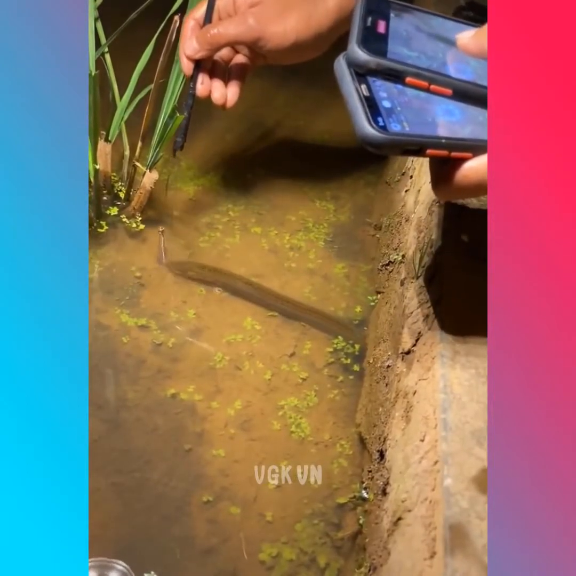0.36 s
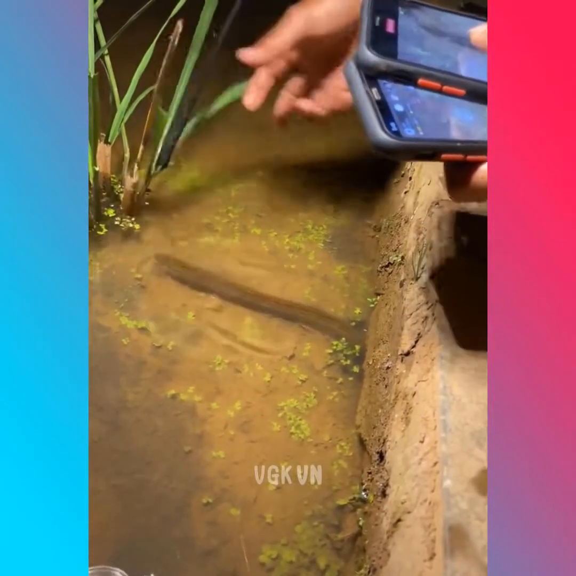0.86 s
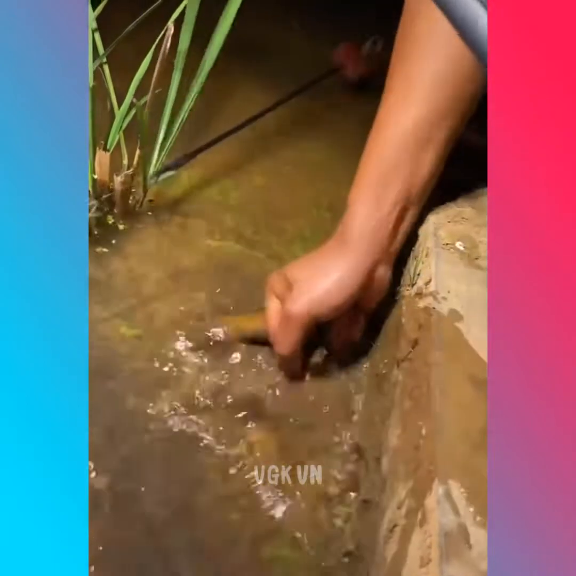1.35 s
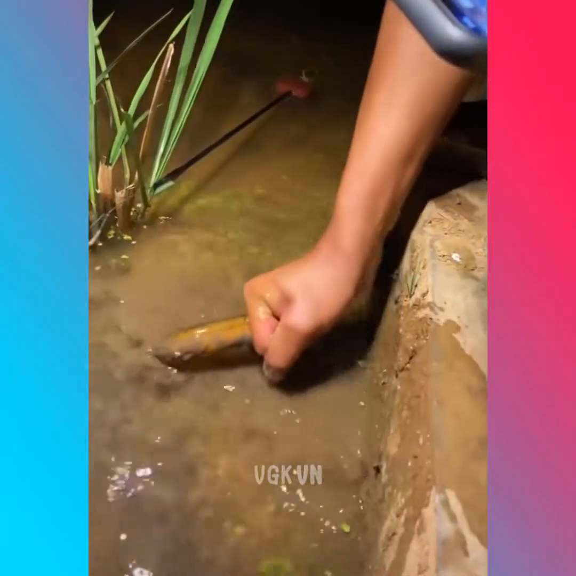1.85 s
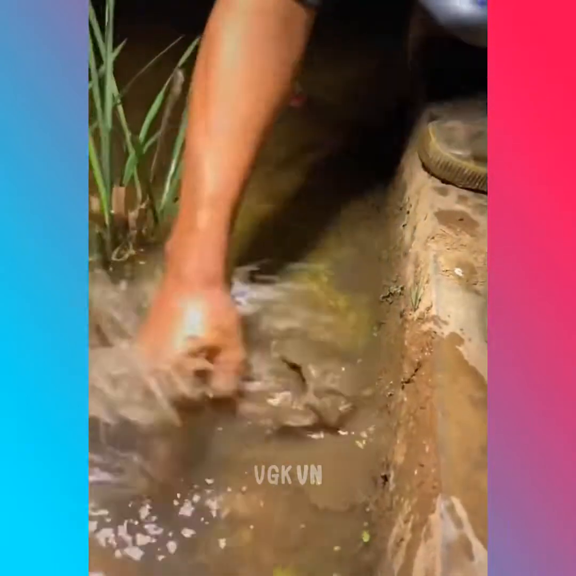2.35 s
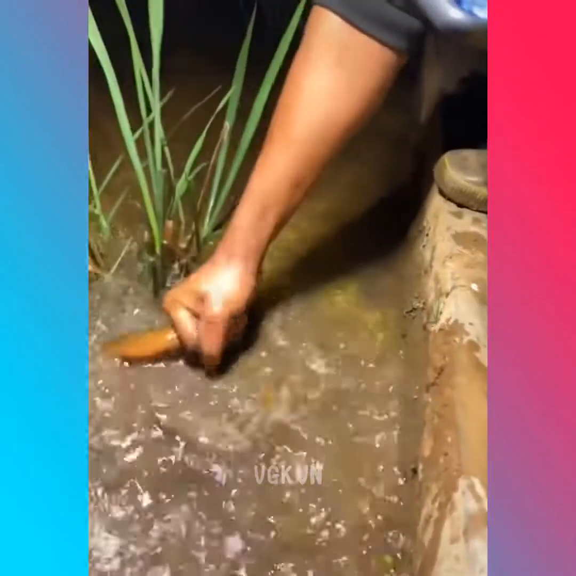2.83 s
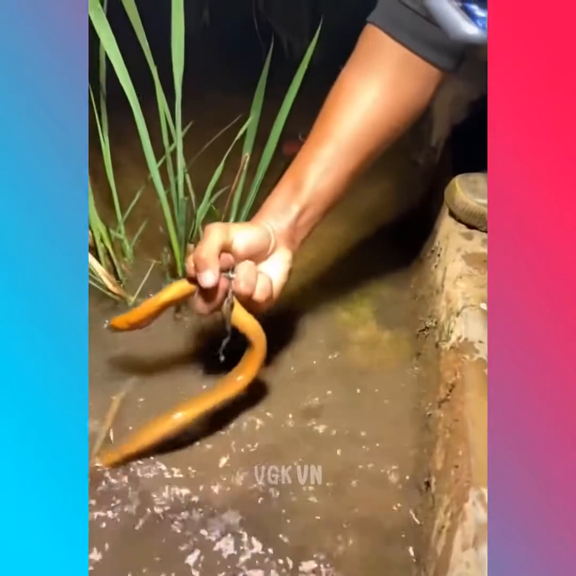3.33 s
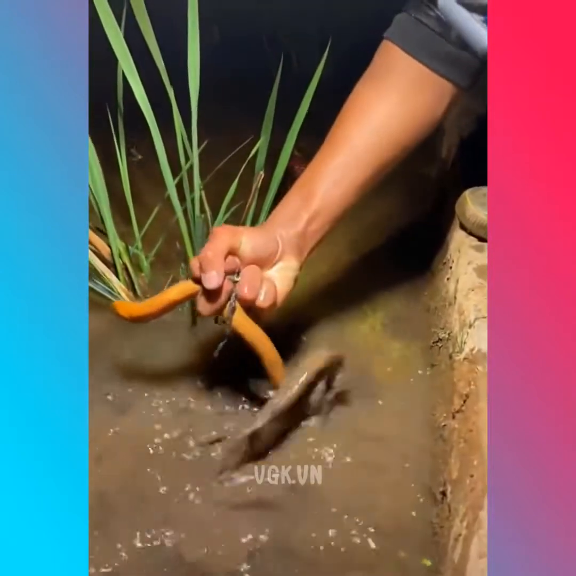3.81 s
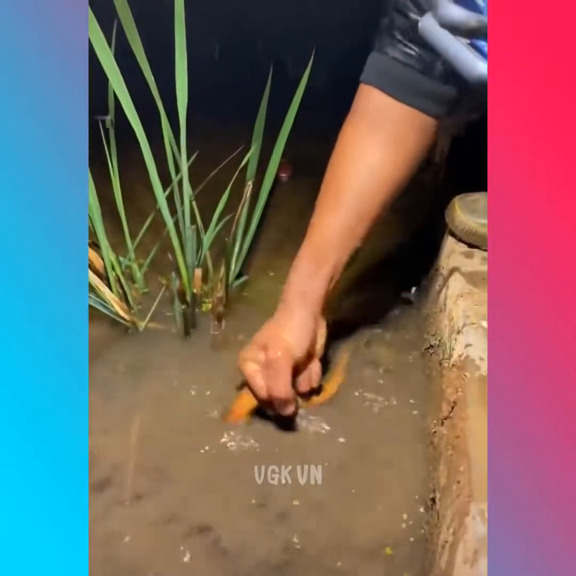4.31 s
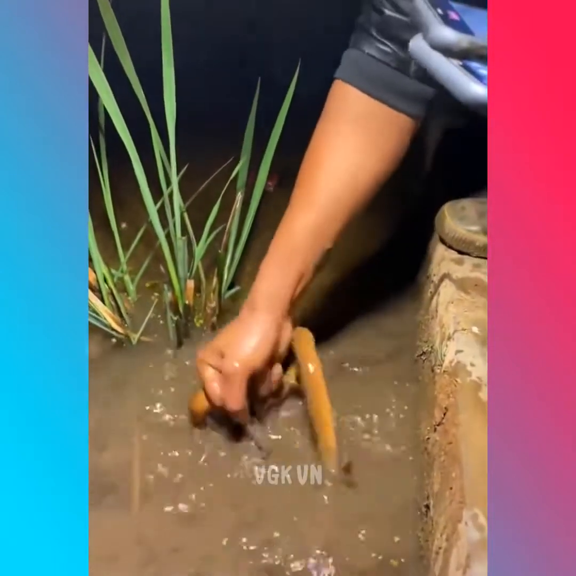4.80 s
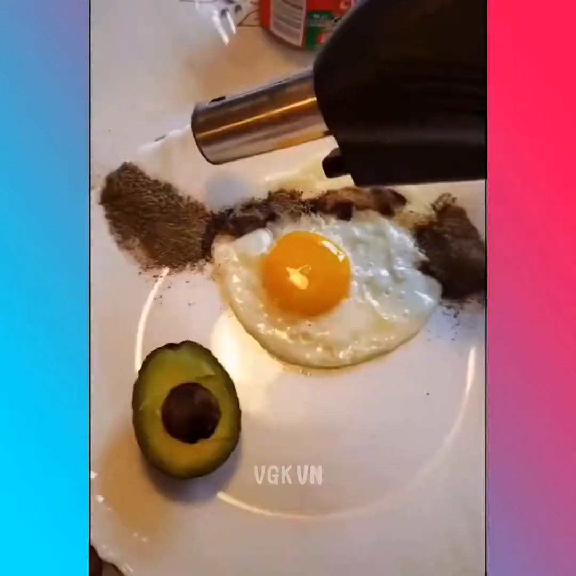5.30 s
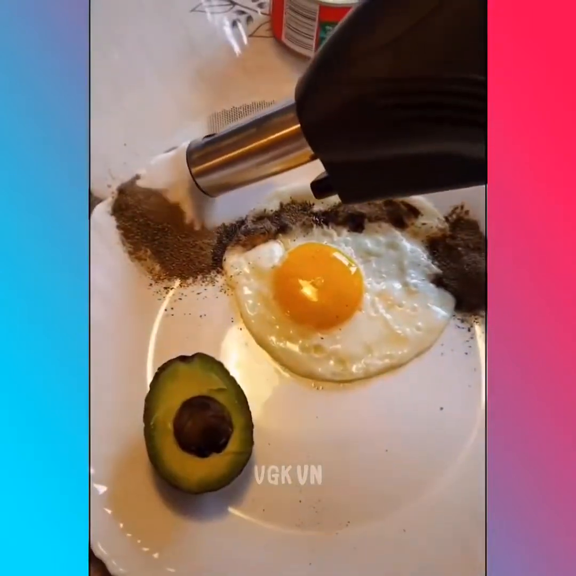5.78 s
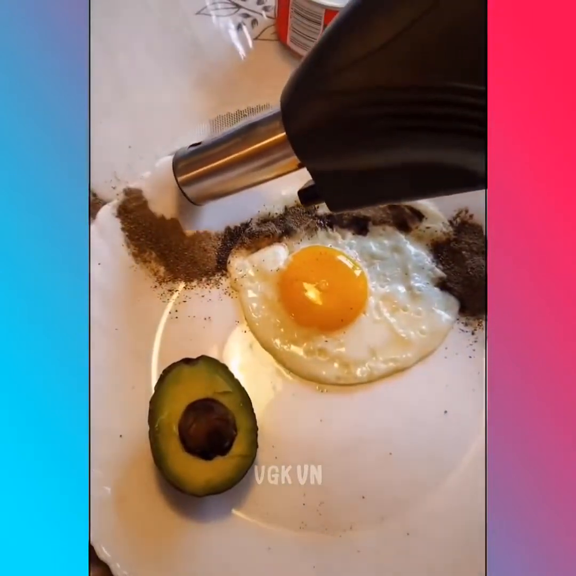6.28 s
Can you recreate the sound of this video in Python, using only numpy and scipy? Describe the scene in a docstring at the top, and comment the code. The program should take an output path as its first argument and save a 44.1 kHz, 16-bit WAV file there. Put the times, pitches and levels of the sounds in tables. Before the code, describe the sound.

A hand plunges into a shallow muddy ditch at night, an eel thrashes in splashing bursts, then a gas torch hiss fades in.

```python
"""A muddy ditch at night, water close on the right: a hand plunges in and an eel thrashes in the shallows.
Slosh and fizz are shaped noise that surges; air pockets ring as gliding sines, spray is short noise bursts.
Behind lie a far rumble, fluttering chorus bands, a frog and a near cricket made of short sliding tones.
After a short silence the scene changes to a kitchen, where the noise of a gas torch, roar and hiss, fades in."""
import sys
import numpy as np
from scipy import signal
from scipy.fft import rfft, irfft, next_fast_len
from scipy.io import wavfile
from scipy.ndimage import uniform_filter1d, map_coordinates

SR = 44100
rng = np.random.default_rng(int(sys.argv[2]) if len(sys.argv) > 2 else 0)


def gain_from_db(level_db):
    """Turn a decibel level (scalar or array-like) into a linear amplitude factor."""
    decades = np.asarray(level_db, float) / 20
    return 10 ** decades


def generate_wav(sig):
    """Save sig (samples, or channels by samples) to the path in sys.argv[1] as 16-bit PCM at SR."""
    pcm = np.round(np.clip(np.atleast_2d(sig).T, -1, 1) * 32767).astype(np.int16)
    wavfile.write(sys.argv[1], SR, pcm)


N = 282240

# Levels in the tables are those of each layer before its own small trims, the microphone and the fades.
# surges of hand and eel; rise and fall span 20 dB of slosh, fizz is against slosh:
# peak_s, slosh_db, rise_s, fall_s, fizz_db
WATER_SURGES = [(0.9, -50.5, 0.076, 0.98, 2.5), (1.068, -29, .025, .07, -8.5), (1.125, -33, .06, .14, -15),
                (1.2, -36.5, .04, .05, -10.5), (1.367, -43, 0.16, 0.11, 0),
                (2.166, -37, 0.059, 0.11, -11.5), (2.335, -39.5, 0.073, .25, 2),
                (2.469, -27.5, .07, .2, -4), (2.544, -26.5, .15, .22, -9.5), (2.669, -29.5, .2, .16, -1.5),
                (2.799, -35, 0.099, 0.096, -2.5), (3.191, -62, .03, 0.36, 6.5),
                (3.786, -51, 0.11, 0.21, -5.5), (4.036, -56, 0.16, 0.11, -5), (4.649, -52, .04, 0.23, 1),
                (4.75, -37.5, 0.12, 0.051, -13.5), (4.983, -44, 0.16, 0.14, -7), (5.2, -53.5, .5, .6, 1.5)]
# larger ringing air pockets: start_s, start_hz, later_hz, level_db, t60_ms
AIR_POCKETS = [(1.05, 1390, 1260, -20, 13), (1.066, 2600, 2520, -1, 3.2), (1.073, 930, 410, -13.5, 23),
               (1.105, 660, 820, -2.5, 5.8), (1.13, 896, 1110, -16, 34), (1.131, 410, 480, -17, 33),
               (1.154, 540, 694, -17.5, 35), (1.197, 790, 804, -12.5, 14), (1.202, 1382, 1730, -20, 22),
               (1.382, 3550, 3640, -18.5, 3.1), (1.38, 1087, 960, -23.5, 73),
               (1.416, 2120, 2050, -26.5, 6.8), (1.499, 2130, 2170, -31.5, 13),
               (1.557, 1550, 1565, -39.5, 20), (2.121, 2770, 3260, -21, 12), (2.158, 2350, 2176, -21.5, 20),
               (2.163, 4290, 3680, -20.5, 18), (2.171, 910, 996, -20.5, 20), (2.221, 820, 940, -19.5, 46),
               (2.438, 224, 294, -17.5, 40), (2.453, 1750, 1860, -8.5, 5.9), (2.464, 1700, 1880, -9.5, 5.2),
               (2.485, 596, 630, -17, 12), (2.527, 1580, 1810, -6, 8.3), (2.547, 840, 866, -12, 25),
               (2.558, 663, 450, -4.5, 12.7), (2.691, 3600, 3220, -8, 5.5), (2.612, 610, 750, -18.5, 37),
               (2.714, 1470, 1525, -17.5, 23), (2.741, 1220, 1230, -13, 9.4),
               (2.788, 1170, 1206, -14.5, 19), (2.798, 2460, 2720, -10.5, 4.3),
               (2.892, 1415, 1380, -24.5, 9.5), (2.962, 1070, 1060, -13, 5.6), (2.997, 800, 1156, -24, 56),
               (3.182, 1060, 645, -25.5, 5.4), (3.254, 720, 920, -29, 44), (3.548, 1150, 1350, -42.5, 30),
               (3.765, 2020, 2170, -24, 14.5), (3.791, 2040, 2040, -23.5, 13), (3.837, 760, 710, -26, 15),
               (3.837, 1790, 1760, -25, 18), (3.919, 1560, 1275, -31.5, 30),
               (3.942, 2080, 2220, -26.5, 10.4), (4.035, 1570, 1630, -31.5, 7.2),
               (4.376, 3800, 3600, -18.5, 4.2), (4.429, 2090, 2210, -33, 19), (4.54, 698, 501, -24, 2.6),
               (4.579, 1020, 1034, -30, 22), (4.669, 1062, 981, -28, 49), (4.691, 920, 750, -17, 10.6),
               (4.735, 518, 463, -21.5, 19.5), (4.736, 3100, 2860, -16, 10), (4.759, 750, 383, -11, 6.4),
               (4.797, 2910, 2830, -28.5, 11), (4.838, 1030, 640, -20, 10.6), (4.886, 550, 578, -6.5, 15.6),
               (4.897, 650, 507, -7, 8.3), (4.905, 424, 310, -19, 25), (4.925, 259, 516, -32.5, 83),
               (4.953, 648, 1157, -34.5, 87), (4.981, 4780, 4930, -28.5, 16),
               (4.989, 3400, 3430, -26.5, 9.9)]
# bursts of spray; mid band against the high band: start_s, high_db, mid_db
SPRAY_BURSTS = [(0.886, -29.5, -18), (1.048, -21.5, -18), (1.108, -20.5, 3.5), (1.195, -20, 4),
                (1.2797, -30.5, 0.5), (1.351, -27, -6), (1.3716, -36, 6), (1.442, -27, -30),
                (2.122, -33.5, 4.5), (2.1548, -27, 7.5), (2.3009, -22.5, 1), (2.431, -30, -5),
                (2.599, -26, 1.5), (2.654, -30, -11), (2.671, -27, -7), (2.716, -38, -1),
                (2.7865, -28.5, -7), (2.877, -24.5, 5), (2.917, -35.5, 9.5), (2.958, -29, -3.5),
                (3.1803, -35, 2), (3.197, -39.5, 2), (3.241, -54, 16), (3.765, -41.5, 5), (3.9103, -63, 24),
                (3.9461, -35.5, -35), (4.1154, -47, -19), (4.16, -53, -15), (4.3207, -34, -36),
                (4.3442, -42, 0), (4.374, -32, -33), (4.409, -26.5, -19), (4.579, -42, 6.5),
                (4.668, -33, 6), (4.716, -28.5, -25), (4.757, -27.5, 2), (4.939, -37.5, -7)]
# low thud of the hand going in: start_s, level_db, t60_s
HAND_PLUNGE = (1.06, -36, 0.49)
# noise colours of slosh, fizz and settling foam: frequency_hz, level_db
SLOSH_COLOUR = [(150, -16), (350, -41), (700, -5.5), (3000, -3.5), (5000, -7), (8000, -36)]
FIZZ_COLOUR = [(800, -38), (2500, -7), (6000, -4), (12000, -9), (13500, -10), (15500, -30.5)]
FOAM_COLOUR = [(1000, -14), (2500, 1), (11000, -4), (15000, -9)]
# left port against right, phase: frequency_hz, phase_rad
PORT_PHASE = [(0, 0), (1040, -1.9), (1150, -3.1), (1380, -5.9), (2500, -5), (3300, -10), (4300, -12.2),
              (7300, -9.42), (16300, 0)]
# left port against right, level of the near water: frequency_hz, level_db
NEAR_SHADOW = [(250, -1), (600, -7), (1200, -3.5), (3000, -3.5), (6000, 0)]
# likeness of the two ports, near water and far night: frequency_hz, likeness_0_to_1
NEAR_LIKENESS = [(350, .95), (1000, 0.7), (5000, 0.5), (6800, 0.95)]
FAR_LIKENESS = [(150, 0.97), (400, 0.96), (1200, 0.016), (5000, 0.056), (6800, 1)]
# near cricket, four strokes a chirp: start_s, level_db
CRICKET_CHIRPS = [(3.409, -52), (3.699, -51), (4.006, -51), (4.289, -53)]
# frog calls: start_s, level_db
FROG_CALLS = [(0.071, -62), (0.46, -58), (1.961, -56)]
# far chorus bands: centre_hz, width_hz, level_db, flutter_knots_per_s
CHORUS_BANDS = [(2060, 370, -71, 150), (2234, 64, -71.5, 14), (4916, 1200, -74, 36)]
# noise colour of the far rumble: frequency_hz, level_db
RUMBLE_COLOUR = [(30, -35.5), (55, -5), (130, 1), (250, -8), (700, -17.5), (4000, -32), (6000, -44),
                 (12900, -57.5)]
# flame level: time_s, level_db
FLAME_LEVEL = [(5.385, -72), (5.55, -66), (5.75, -59), (5.9, -56.5), (6.06, -56), (6.22, -49.5),
               (6.4, -49.5)]
# noise colours of the flame: frequency_hz, level_db
ROAR_COLOUR = [(35, -29), (200, -6.5), (550, -1.5), (1500, -5), (2900, -4.5), (4300, -4.5), (6500, -25.5)]
HISS_COLOUR = [(2500, -4), (7500, -2)]
# likeness of the two sides of the flame: frequency_hz, likeness
FLAME_LIKENESS = [(150, 0.93), (1500, 0.028), (8000, 0.32)]
# change of scene: fade_start_s, ditch_out_s, kitchen_in_s
SCENE_CHANGE = (4.98, 5.322, 5.385)
# upper band limits: ditch_hz, kitchen_hz
BAND_TOPS = (15600, 13200)

STIR_S = 0.775  # the water first moves
FIZZ_SPREADS = 1.3  # fizz swells and dies this many times slower than slosh
TRICKLE_DB = -66.5  # floor under the fizz, which never quite settles once stirred
CALM_DB, WILD_DB = -65.5, -48.5  # fizz levels between which the lumpiness grows
CROWDING = 0.4  # grain density follows the churn's amplitude to this power
FOAM_S = 0.13  # time constant with which foam builds and fades
SETTLE_DB, SETTLE_FOLLOWS = -22, 0.68  # offset of the foam hiss; its dB for each dB of foam
STROKE_S = 0.037  # between the starts of the cricket's strokes


def water():
    """All the near water: churning noise, ringing air, spray, foam and the thud, heard from the right."""
    slosh_db, fizz_db = churn()
    wild = np.clip((fizz_db - CALM_DB) / (WILD_DB - CALM_DB), 0.3, 1)
    lumps = wild * wobble(110)
    slosh = gain_from_db(slosh_db - 4.5 + 3.8 * lumps) * noise(SLOSH_COLOUR, patchy_db=4.5)
    crackle_db = 3.5 * wild * wobble(280)
    fizz = gain_from_db(fizz_db + 2.5 * lumps + crackle_db) * noise(FIZZ_COLOUR, patchy_db=5)
    ringing = ringing_air(slosh_db + 2 * lumps)
    pair = slosh + fizz + settling_foam(fizz_db) + spray() + heave(slosh_db) + thud()
    pair = pair + [ringing, scattered(ringing, t60=0.051)]
    return ports(pair, NEAR_LIKENESS, NEAR_SHADOW)


def churn():
    """Slosh and fizz levels in dB: every surge rises to its peak and falls away, and their powers add."""
    t = np.arange(N) / SR
    slosh, fizz = np.zeros(N), np.full(N, gain_from_db(2 * TRICKLE_DB))
    for peak_s, db, rise, fall, fizz_db in WATER_SURGES:
        away_db = 20 * np.where(t < peak_s, (peak_s - t) / rise, (t - peak_s) / fall)
        slosh += gain_from_db(2 * (db - away_db))
        fizz += gain_from_db(2 * (db + fizz_db - away_db / FIZZ_SPREADS))
    still_db = np.interp(t, (STIR_S, STIR_S + 0.039), (-40, 0))
    return [10 * np.log10(power + 1e-12) + still_db for power in (slosh, fizz)]


def ringing_air(churn_db):
    """Larger pockets, froth and droplets all ring; none of them radiates bass."""
    start_s, hz, later_hz, db, t60_ms = np.transpose(AIR_POCKETS)
    pockets = rings(start_s, hz, later_hz, db, t60_ms / 1000, attack=0.083)
    froth = grains(churn_db - 1.5, low_hz=480, span=8, cycles=24, count=1100)
    droplets = grains(churn_db, low_hz=1600, span=3.4, cycles=16, count=1200)
    return filtered(pockets + froth + droplets, lambda hz: hz ** 2 / (hz ** 2 + 220 ** 2))


def grains(level_db, low_hz, span, cycles, count):
    """Random bubbles or droplets; they crowd and grow with the churn, a few are larger."""
    draw = rng.random((count, 4))
    crowd = np.cumsum(gain_from_db(CROWDING * uniform_filter1d(level_db, size=2000)))
    start_s = np.interp(draw[:, 0], crowd / crowd[-1], np.arange(N) / SR)
    hz = low_hz * span ** draw[:, 1]
    later_hz = hz * (1.11 + 0.19 * draw[:, 3])
    db = level_db[(start_s * SR).astype(int)] - 4.18 * np.log(draw[:, 2] + 0.018)
    return rings(start_s, hz, later_hz, db, np.minimum(cycles / hz, 0.018), attack=0.009)


def rings(start_s, hz, later_hz, db, t60, attack):
    """Sines that hold, then die; the pitch glides on as the pocket rises."""
    t = np.arange(int(np.max(t60) * SR)) / SR
    columns = (start_s, hz, later_hz, db, t60)
    start_s, hz, later_hz, db, t60 = (np.asarray(c, float)[:, None] for c in columns)
    glide = (later_hz - hz) / (t60 / 3)  # Hz a second: later_hz is reached at a third of t60
    swell = gain_from_db(db - 60 * (t / t60) ** 1.74) * (1 - np.exp(-t / (attack * t60)))
    body = swell * np.sin(2 * np.pi * np.abs(hz + glide * t / 2) * t)
    where = (start_s * SR).astype(int) + np.arange(len(t))
    return np.bincount(where.ravel(), body.ravel(), N + SR)[:N]


def spray():
    """Bursts of spattering drops: fast-rising, fast-dying noise in a high and a mid band."""
    t, high, mid = np.arange(SR // 10) / SR, np.zeros(N), np.zeros(N)
    for start_s, db, mid_db in SPRAY_BURSTS:
        burst = gain_from_db(db - 60 * (t / 0.012) ** 1.61) * (1 - np.exp(-t / 0.0012))
        high[round(start_s * SR):][:len(t)] += burst
        mid[round(start_s * SR):][:len(t)] += gain_from_db(mid_db) * burst
    return high * noise(FIZZ_COLOUR, patchy_db=3) + mid * noise(SLOSH_COLOUR, patchy_db=3)


def heave(slosh_db):
    """Only heavy churning pushes the low end: two dB for each dB of slosh."""
    colour = [(25, -27), (200, -12.5), (400, -8.5), (900, -30.5)]
    return gain_from_db(2 * slosh_db + 16.0) * noise(colour, patchy_db=2.0)


def thud():
    """The hand going in: low noise that swells quickly and dies ever faster."""
    start_s, db, t60 = HAND_PLUNGE
    since = np.maximum(np.arange(N) / SR - start_s, 0)
    level = gain_from_db(db - 60 * (since / t60) ** 2) * (1 - np.exp(-since / 0.018))
    return level * noise([(25, -23.5), (55, -5.5), (200, -6.0), (350, -24.5)], patchy_db=6.0)


def settling_foam(fizz_db):
    """Foam builds with the power of the fizz and fades more slowly, as hiss without the lumps."""
    keep = np.exp(-1 / (FOAM_S * SR))
    foam_db = 10 * np.log10(signal.lfilter([1 - keep], [1, -keep], gain_from_db(2 * fizz_db)))
    stirred = np.clip((np.arange(N) / SR - STIR_S) / 0.048, 0, 1)
    return stirred * gain_from_db(SETTLE_DB + SETTLE_FOLLOWS * foam_db) * noise(FOAM_COLOUR, patchy_db=6.5)


def night():
    """The dark around the ditch: cricket and frog over rumble and chorus, spread across both ports."""
    calls = scattered(frog(), t60=0.23)  # the frog is further off
    calls = calls + cricket()
    pair = rumble() + chorus() + [calls, scattered(calls, t60=0.031)]
    return ports(pair, FAR_LIKENESS, [(1000, 0.0034)])


def cricket():
    """Four falling strokes a chirp, their levels uneven by chance."""
    out = np.zeros(N)
    for start_s, db in CRICKET_CHIRPS:
        at = start_s + STROKE_S * np.arange(4)
        out += strokes(at, 5050, 4620, db + rng.normal(0, 4.0, 4), length=0.024)
    return out


def frog():
    """Six rising pulses a call, swelling by 6 dB, uneven by chance in time and level."""
    out = np.zeros(N)
    for start_s, db in FROG_CALLS:
        at = start_s + 0.015 * np.arange(6) + rng.normal(0, 0.0044, 6)
        pulse_db = db + np.linspace(-6, 0, 6) + rng.normal(0, 3.5, 6)
        out += strokes(at, 3100, 3550, pulse_db, length=0.011)
    return out


def strokes(starts, hz, end_hz, db, length):
    """Short swelling tones that slide in pitch."""
    t = np.arange(int(length * SR)) / SR
    tone = np.hanning(len(t)) * np.sin(2 * np.pi * (hz + (end_hz - hz) * t / length / 2) * t)
    hits = np.bincount((np.asarray(starts) * SR).astype(int), gain_from_db(db), N)
    return signal.fftconvolve(hits, tone)[:N]


def chorus():
    """Far callers blurred into noise bands, each with a quick flutter and a slow drift in level."""
    out = np.zeros((2, N))
    for hz, width_hz, db, rate in CHORUS_BANDS:
        inner = width_hz / 3
        colour = [(hz - width_hz, -40), (hz - inner, 0), (hz + inner, 0), (hz + width_hz, -40)]
        out += gain_from_db(db + 2.4 * wobble(rate) + 0.89 * wobble(0.46)) * noise(colour, patchy_db=-1.0)
    return out


def rumble():
    """Far rumble: mostly low noise that drifts a little in level."""
    return gain_from_db(-50.5) * gain_from_db(1.2 * wobble(3)) * noise(RUMBLE_COLOUR, patchy_db=0.63)


def torch():
    """A turbulent flame: fluttering roar under the jet's hiss, its lows stronger on the left."""
    time_s, db = np.transpose(FLAME_LEVEL)
    flame_db = np.interp(np.arange(N) / SR, time_s, db, left=-120, right=db[-1])
    flutter = wobble(30)
    roar = gain_from_db(flame_db + 1.3 * flutter) * noise(ROAR_COLOUR, patchy_db=2)
    hiss = gain_from_db(flame_db + 1.0 + 0.39 * flutter) * noise(HISS_COLOUR, patchy_db=2.5)
    # the wider this angle, the less alike the two sides
    turn = lambda hz: np.arccos(np.clip(along(FLAME_LIKENESS, hz), -1, 1)) / 2
    mid, side = filtered(roar + hiss, lambda hz: np.array([np.cos(turn(hz)), np.sin(turn(hz))]))
    lean = lambda hz: gain_from_db(along([(500, 2.03), (2500, 0.15)], hz) * [[1], [-1]])
    return filtered(np.array([mid + side, mid - side]), lean)


def ports(pair, alike, shadow):
    """The right port hears the first signal; the left a phase-shifted copy mixed with the second, shaded."""
    phase_hz, rad = np.transpose(PORT_PHASE)

    def left_mix(hz):
        same = np.clip(along(alike, hz), 0, 1)
        copy = same * np.exp(1j * np.interp(hz, phase_hz, rad))
        return gain_from_db(along(shadow, hz)) * [copy, np.sqrt(1 - same ** 2)]

    return np.array([filtered(pair, left_mix).sum(0), pair[0]])


def scattered(x, t60):
    """The same sound by way of the bank and reeds: a short random smear."""
    tail = rng.standard_normal(1500) * gain_from_db(-60 * np.arange(1500) / SR / t60)
    return signal.fftconvolve(x, tail / np.linalg.norm(tail))[:N]


def noise(spectrum, patchy_db):
    """Two unrelated noises, rms 1 over the pair, that share patches of random gain in time and pitch."""
    z = signal.stft(rng.standard_normal((2, N)), nperseg=256)[2]
    field = uniform_filter1d(rng.standard_normal(z.shape[1:]), size=5, axis=0)
    field = uniform_filter1d(field, size=4, axis=1)
    pair = signal.istft(z * gain_from_db(patchy_db * unit(field)), nperseg=256)[1][:, :N]
    return unit(filtered(pair, lambda hz: gain_from_db(along(spectrum, hz))))


def wobble(rate):
    """A smooth random curve, rate knots a second."""
    return map_coordinates(rng.standard_normal(int(N * rate / SR) + 4), [np.arange(N) * rate / SR])


def filtered(x, response):
    """x times a real or complex response of frequency."""
    m = next_fast_len(N + 8192)
    return irfft(rfft(x, m) * response(np.fft.rfftfreq(m, 1 / SR)), m)[..., :N]


def along(points, hz):
    """Values between (frequency_hz, value) points on a log axis."""
    f, v = np.transpose(points)
    return np.interp(np.log(hz + 1), np.log(f + 1), v)


def unit(x):
    """Scaled to rms 1."""
    return x / np.sqrt(np.mean(x ** 2) + 1e-20)


def scene():
    """The ditch fades by 9 dB and is cut off; after a short silence the scene changes to the kitchen."""
    t = np.arange(N) / SR
    fade_s, out_s, in_s = SCENE_CHANGE
    ditch_top, kitchen_top = BAND_TOPS
    ditch = filtered(water() + night(), lambda hz: np.clip((ditch_top - hz) / 150, 0, 1))
    kitchen = filtered(torch(), lambda hz: np.clip((kitchen_top - hz) / 150, 0, 1))
    fade = gain_from_db(np.interp(t, (fade_s, out_s), (0, -9))) * np.clip((out_s - t) / 0.004, 0, 1)
    return ditch * fade + kitchen * np.clip((t - in_s) / 0.0093, 0, 1)


def roll_off(x):
    """The treble ends steeply here."""
    return signal.sosfilt(signal.butter(12, 16650, fs=SR, output="sos"), x)


def record(dry):
    """Hands on the finished mix of ditch and kitchen."""
    return roll_off(dry)


dry = scene()
out = record(dry)
generate_wav(out)
```